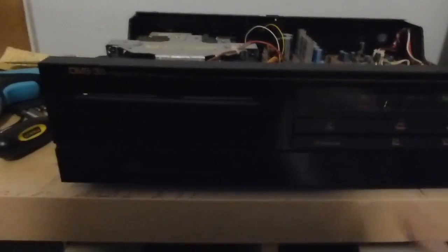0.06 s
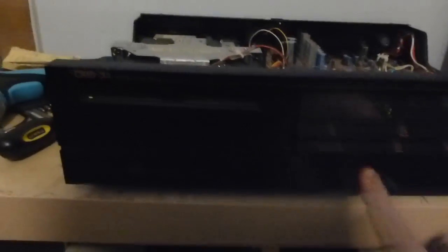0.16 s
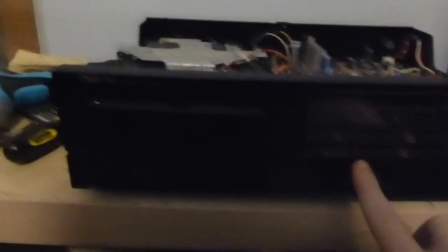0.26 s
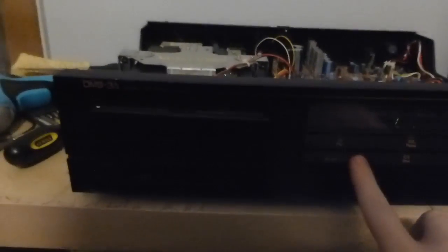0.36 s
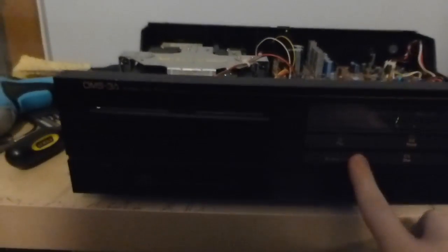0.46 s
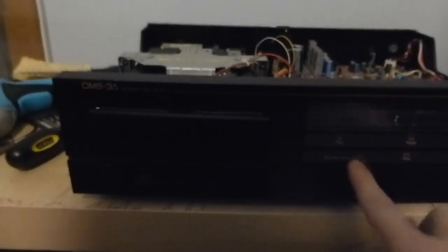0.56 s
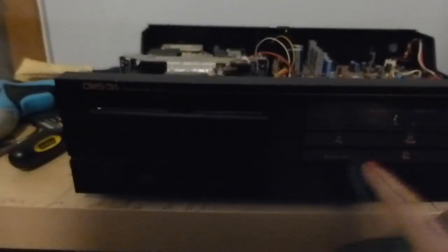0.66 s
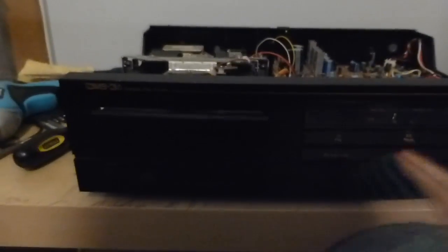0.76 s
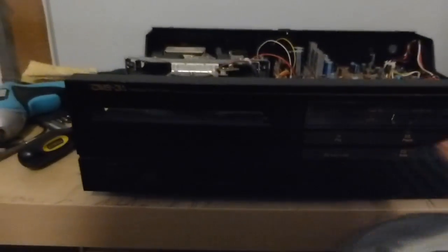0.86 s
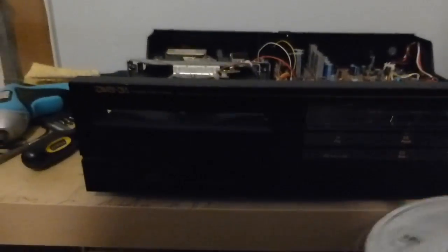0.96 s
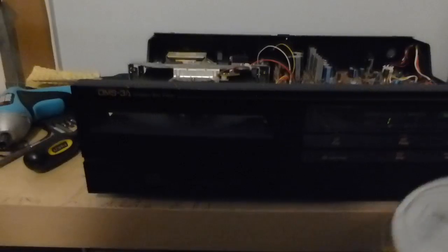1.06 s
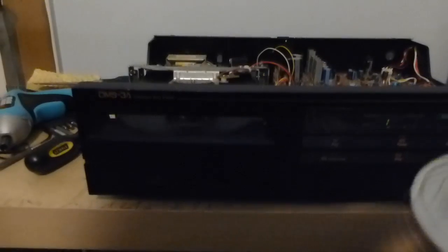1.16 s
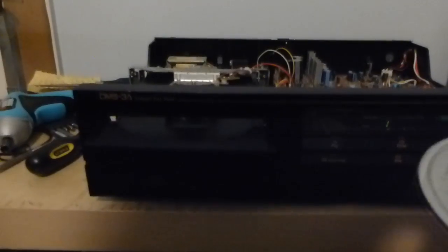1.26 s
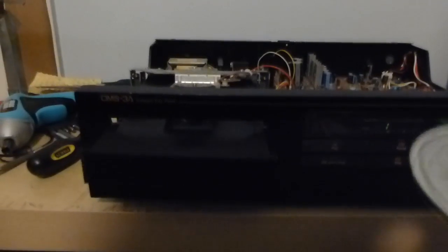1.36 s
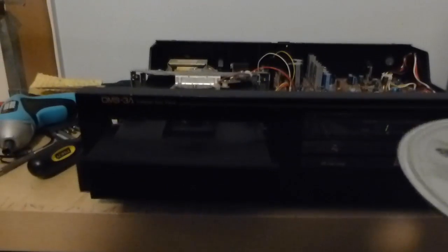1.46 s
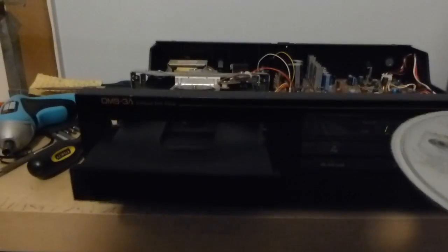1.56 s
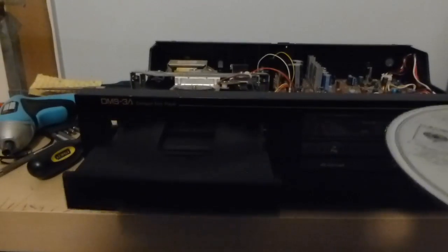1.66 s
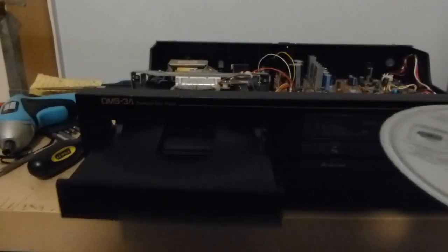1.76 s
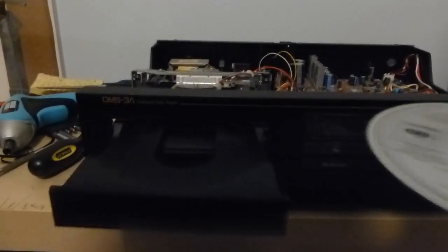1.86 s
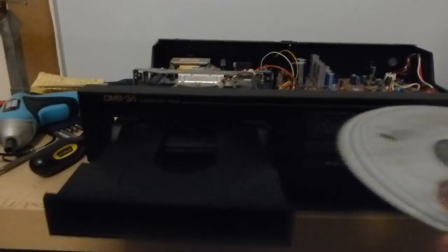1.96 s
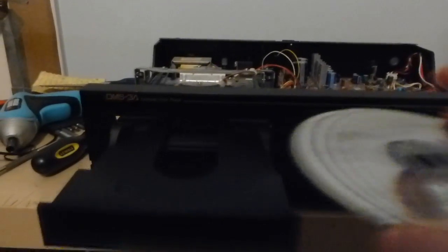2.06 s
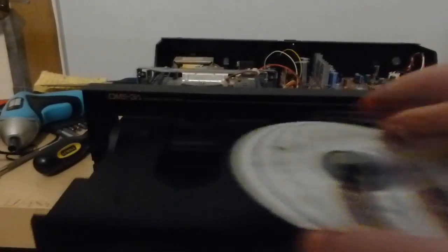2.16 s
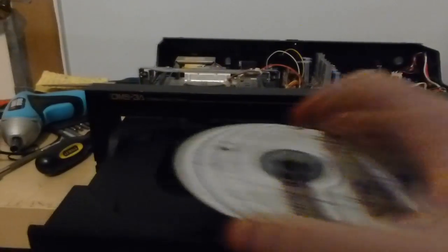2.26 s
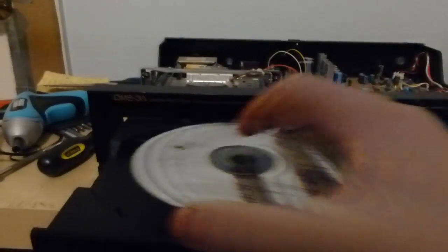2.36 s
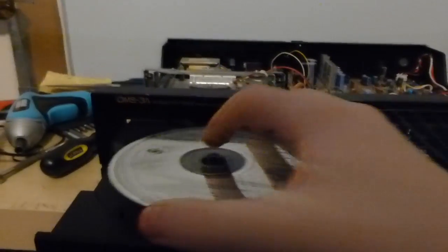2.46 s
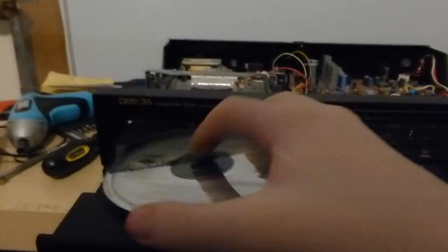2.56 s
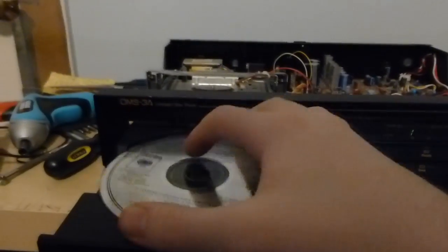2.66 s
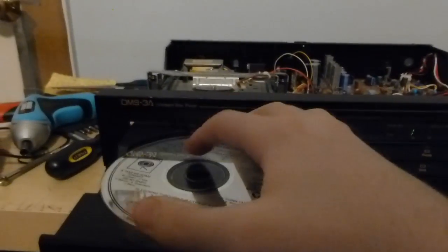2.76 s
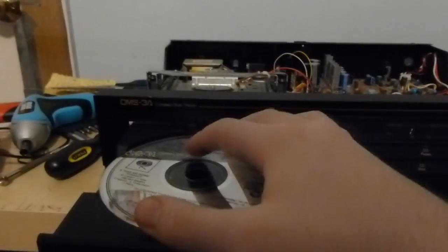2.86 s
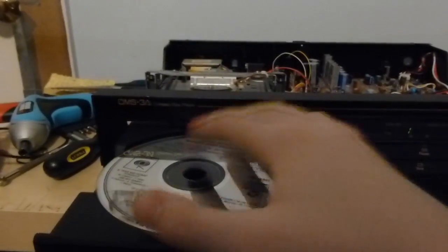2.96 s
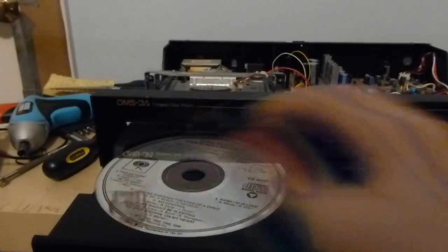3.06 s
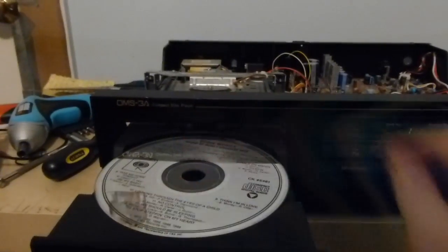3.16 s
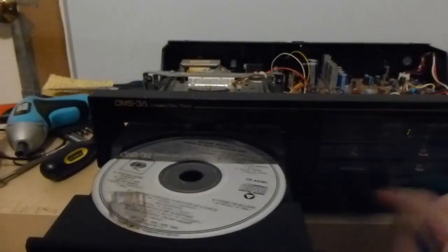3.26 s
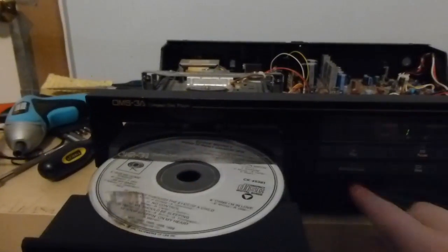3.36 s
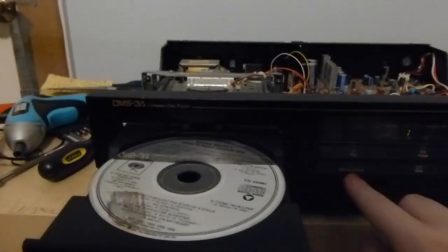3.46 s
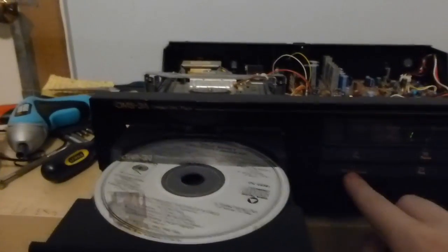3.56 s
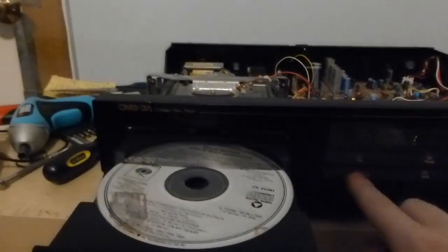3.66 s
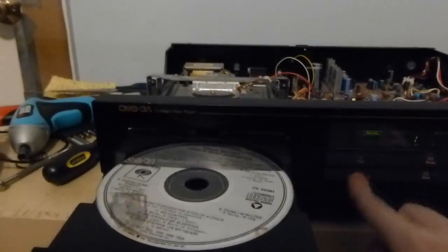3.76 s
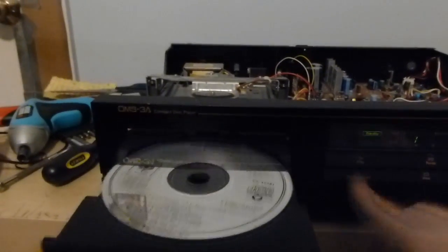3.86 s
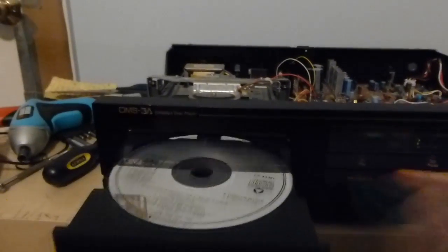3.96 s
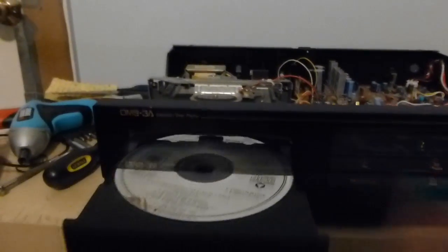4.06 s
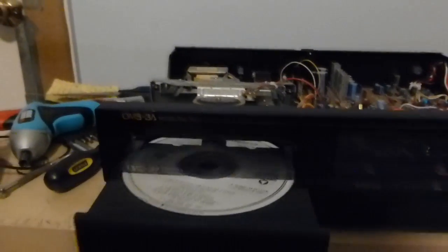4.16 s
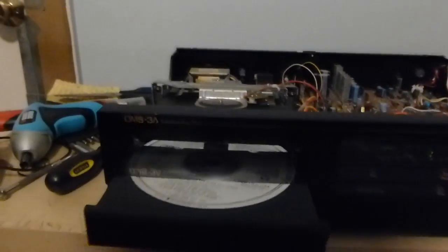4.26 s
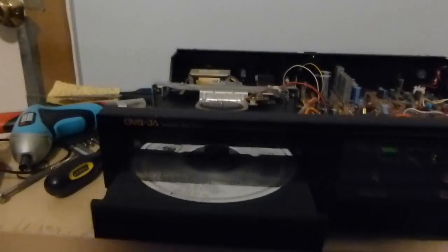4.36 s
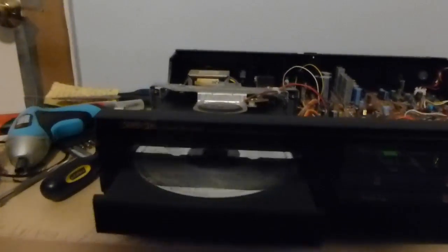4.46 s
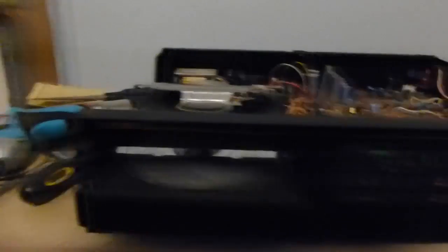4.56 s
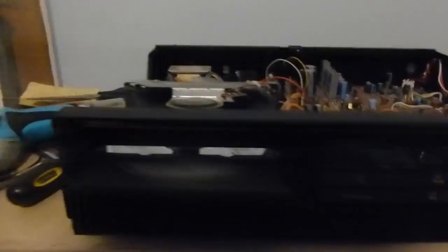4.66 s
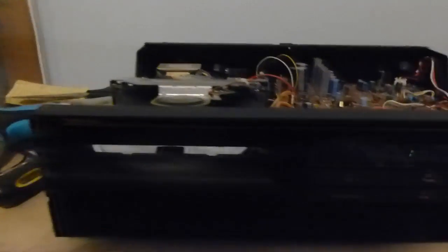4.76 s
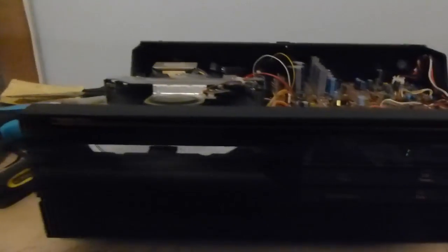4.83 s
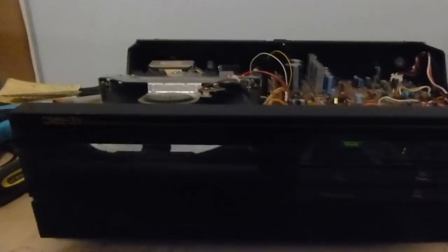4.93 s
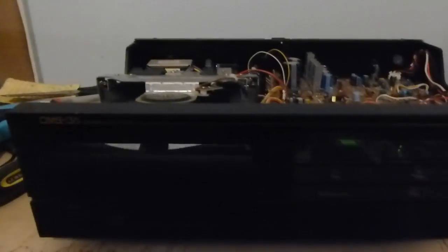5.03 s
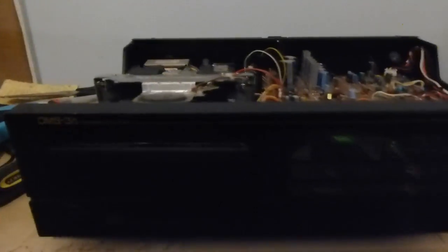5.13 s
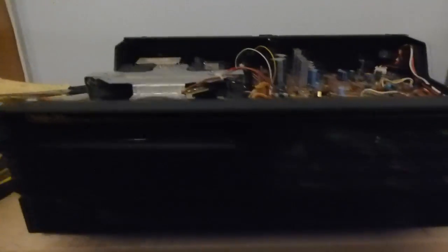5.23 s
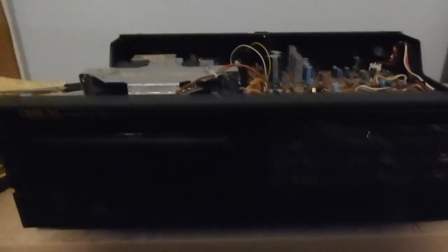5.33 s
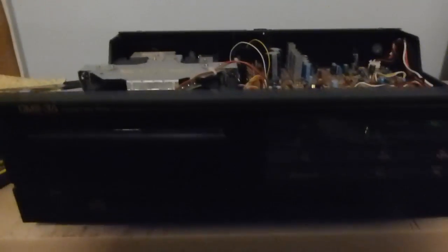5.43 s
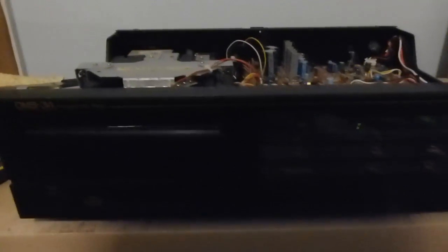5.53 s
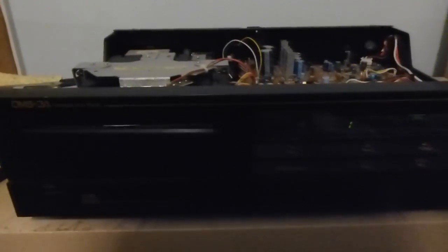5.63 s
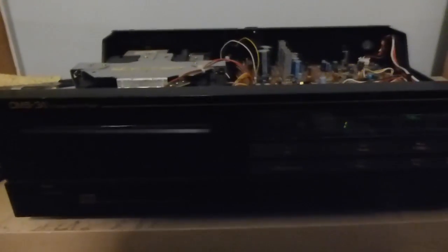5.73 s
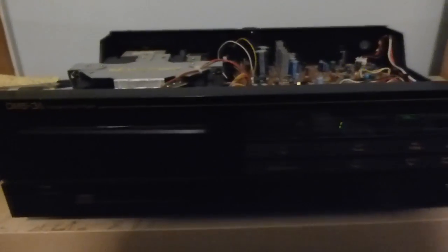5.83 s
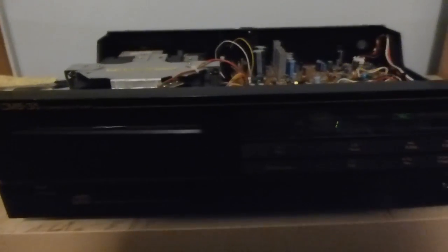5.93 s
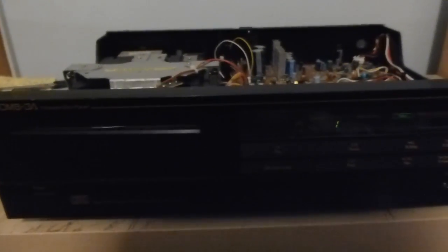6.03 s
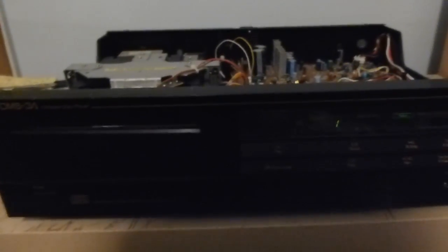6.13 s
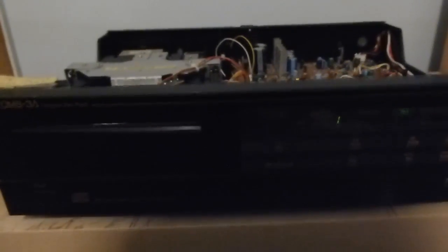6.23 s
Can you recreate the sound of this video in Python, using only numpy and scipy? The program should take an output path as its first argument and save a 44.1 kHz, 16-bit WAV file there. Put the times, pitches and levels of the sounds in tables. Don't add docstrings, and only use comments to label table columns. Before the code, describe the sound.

A disc player's button clicks, steel clunks up, its tray whirs out, a disc drops in, and the tray whirs back shut with a clunk.

```python
import sys
import numpy as np
from scipy import signal
from scipy.fft import rfft, irfft, next_fast_len
from scipy.io import wavfile
from scipy.ndimage import uniform_filter1d, map_coordinates

SR = 44100
rng = np.random.default_rng(int(sys.argv[2]) if len(sys.argv) > 2 else 0)


def undo_db(level):
    steps = np.asarray(level, float) / 20
    return 10 ** steps


def dump_mix(stems):
    frames = np.atleast_2d(stems).T
    limited = np.clip(frames, -1, 1)
    pcm = np.round(limited * 32767).astype(np.int16)
    wavfile.write(sys.argv[1], SR, pcm)


N = 277464
T = np.arange(N) / SR


def unit(x):
    return x / np.sqrt(np.mean(x ** 2) + 1e-20)


def along(points, hz):
    f, v = np.transpose(points)
    return np.interp(np.log(hz + 1), np.log(f + 1), v)


def wobble(rate):
    return map_coordinates(rng.standard_normal(int(N * rate / SR) + 4), [T * rate])


def filtered(x, response):
    n = x.shape[-1]
    m = next_fast_len(n + 8192)
    return irfft(rfft(x, m) * response(np.fft.rfftfreq(m, 1 / SR)), m)[..., :n]


def peak(f, hz, width):
    return 1j * f * width / (hz * hz - f * f + 1j * f * width)


def body(peaks, f):
    return sum((-1) ** k * undo_db(db) * peak(f, hz, width) for k, (hz, width, db) in enumerate(peaks))


def low_cut(f, hz):
    return (1j * f / (hz + 1j * f)) ** 2


def rush(response, alike):
    def turn(hz):
        return np.arccos(np.clip(along(alike, hz), -1, 1)) / 2

    noise = rng.standard_normal((2, N))
    mid, side = filtered(noise, lambda hz: response(hz) * [np.cos(turn(hz)), np.sin(turn(hz))])
    return unit(np.array([mid + side, mid - side]))


def bands(peaks, alike, patchy_db, drift):
    x = rush(lambda f: sum(undo_db(db) * np.abs(peak(f, hz, w)) ** 2 for hz, w, db in peaks), alike)
    z = signal.stft(x, nperseg=1024)[2]
    field = uniform_filter1d(rng.standard_normal(z.shape[1:]), size=5, axis=0)
    field = uniform_filter1d(field, size=8, axis=1)
    x = signal.istft(z * undo_db(patchy_db * unit(field)), nperseg=1024)[1][:, :N]
    read = np.clip(np.cumsum(1 + drift * wobble(3)), 0, N - 1)
    return unit(np.array([np.interp(read, np.arange(N), side) for side in x]))


def add(out, s, sound, db, pan_db=0):
    part = out[:, round(s * SR):][:, :len(sound)]
    gain = undo_db(db + np.array([[pan_db / 2], [-pan_db / 2]]))
    part += (gain * sound / np.abs(sound).max())[:, :part.shape[1]]


def taps(rows, rough, above_hz):
    out, t = np.zeros((2, N)), T[:SR // 20]
    for s, db, hz, swell in rows:
        u = t / (swell + 1e-4)
        jitter = np.cumsum(rng.standard_normal(len(t))) * np.sqrt(hz / SR)
        turns = hz * t + rough * jitter + rng.random()
        add(out, s - swell, u * np.exp(-u) * np.sin(2 * np.pi * turns), db, .8)
    return filtered(out, lambda f: low_cut(f, above_hz) ** 2 / (1 + 1j * f / 13000))


# f/Hz, level/dB rms
HUM = [(120, -59.5), (240, -73)]
# f/Hz, width/Hz, level/dB
FAN = [(267, 28, -2.5), (332, 44, -2), (407, 36, -12), (1075, 56, -6.5), (1162, 37, -4.5), (1210, 46, 1)]
# f/Hz, level/dB per Hz
MURMUR = [(82, -37), (140, -14), (146, -13), (238, -13), (286, -17.5), (316, -4.5), (343, -9.5),
          (708, -12.5), (1060, -10.5), (1600, -18.5), (2080, -60), (3520, -120)]
# f/Hz, level/dB per Hz
PREAMP = [(880, -42), (1500, 2), (1760, 2.5), (3390, -7), (4550, -3), (5650, -3.5), (11400, -10),
          (14200, -12.5), (15700, -13.5)]
# f/Hz, level/dB per Hz
SUB = [(15, -2), (40, -9.5), (65, -21.5), (100, -0.5), (150, 2)]
# f/Hz, likeness/1
ALIKE_FLOOR = [(60, 0.59), (180, 0.99), (550, -0.19), (1650, -0.53), (4970, 0.017), (15000, 0.51)]


def floor():
    hum = 0
    for hz, db in HUM:
        hum = hum + undo_db(db + .4 * wobble(9.3)) * np.sqrt(2) * np.sin(2 * np.pi * hz * T)
    fan = undo_db(-61.5) * bands(FAN, ALIKE_FLOOR, patchy_db=4.0, drift=.018)
    murmur = undo_db(-58.5 + 0.76 * wobble(1.0)) * rush(lambda f: undo_db(along(MURMUR, f)), ALIKE_FLOOR)
    hiss = undo_db(-60.5 + 0.14 * wobble(4.5)) * rush(lambda f: undo_db(along(PREAMP, f)), ALIKE_FLOOR)
    sub = undo_db(-70.5) * rush(lambda f: undo_db(along(SUB, f)) * (f < 150), [(30, 0.28), (120, 0.43)])
    return hum + fan + murmur + hiss + sub


# f/Hz, width/Hz, level/dB
CASE = [(269, 65, -9.5), (334, 38, -2), (432, 86, -8), (564, 17, -4.5), (632, 12, -4), (749, 19, -5),
        (755, 17.4, 0), (865, 20, -6.5), (898, 16, -3.5), (978, 22.5, -1.5), (1070, 62, -11),
        (1212, 21, -11), (1307, 54, -11), (1486, 55, -2.5), (1459, 40.5, -3.5)]
# f/Hz, width/Hz, level/dB
DISC = [(198, 21, -3), (318, 61, 2), (455, 17, 1.5), (590, 53, 0.5), (740, 81, -11), (940, 25, 0.5),
        (1000, 24, -4), (1370, 83, -1), (1500, 44, -7)]
# t/s, peak level/dB, centre f/Hz, spread to other modes/dB
KNOCKS_OPENING = [(0.049, -41.5, 516, -12), (0.524, -32.5, 550, -15), (0.553, -32.5, 920, -7),
                  (0.636, -25, 553, -6), (0.651, -29, 560, 3), (0.691, -29.5, 1010, 1),
                  (0.74, -18.5, 358, -13), (0.769, -21.5, 624, -11), (0.795, -22.5, 630, -14),
                  (0.82, -29, 890, -2), (0.845, -32, 566, -6), (0.992, -32, 1210, -19),
                  (1.038, -32.5, 535, 4), (1.983, -31, 855, 10), (2.104, -43, 560, 0),
                  (2.299, -55, 1220, -4)]
# t/s, peak level/dB, centre f/Hz, spread to other modes/dB
KNOCKS_DISC = [
    (2.664, -37.5, 960, 0),
    (2.714, -43.5, 520, -1),
    (2.749, -28.5, 820, -10),
    (2.764, -26, 915, -6),
    (2.797, -28.5, 700, 6),
    (2.803, -30, 970, 12),
    (2.831, -32, 980, 16),
]
# t/s, peak level/dB, centre f/Hz, spread to other modes/dB
KNOCKS_CLOSING = [(3.871, -34, 532, -11.5), (3.969, -36, 940, -8), (4.153, -34, 600, -4),
                  (4.257, -29.5, 563, -11), (4.291, -29.5, 500, -6), (4.601, -44, 450, -12),
                  (5.069, -35.5, 630, -15), (5.2164, -18.5, 1070, 9), (5.237, -19.5, 432, -6),
                  (5.303, -29, 670, -5), (5.387, -26.5, 1000, -8), (5.559, -46, 281, -24)]
# t/s, peak level/dB, centre f/Hz, spread to other modes/dB
KNOCKS_LATCH = [
    (0.456, -27, 940, -4),
    (5.422, -32, 776, -15),
]
# rise/s, t60 of a -32 dB knock/s, longer/s per dB
KNOCK_SHAPES = [
    (0.0043, 0.06, 0.04),
    (0.0038, 0.19, -0.0141),
    (0.0037, 0.1342, .0025),
    (0.0012, 0.28, 0.08),
]


def knocks():
    out, t = np.zeros((2, N)), T[:SR // 3]
    f = np.fft.rfftfreq(next_fast_len(len(t) + 8192), 1 / SR)
    case, disc = [low_cut(f, 216) * (body(modes, f) + 0.37 * peak(f, 480, 950)) for modes in (CASE, DISC)]
    stages = (KNOCKS_OPENING, KNOCKS_DISC, KNOCKS_CLOSING, KNOCKS_LATCH)
    for rows, hollow, (rise, usual_t60, longer) in zip(stages, (case, disc, case, case), KNOCK_SHAPES):
        for s, db, hz, spread_db in rows:
            t60 = max(usual_t60 + longer * (db + 32.0), .031)
            push = rng.standard_normal(len(t)) * undo_db(-60 * t / t60) * (1 - np.exp(-t / (rise + 1e-4)))
            firmness = np.clip(1.5 - rise / 0.0032, 0, 1)
            push += 4 * np.exp(-(t / 0.00017 - 3) ** 2) * firmness
            reach = undo_db(spread_db) * peak(f, 720, 1004) + peak(f, hz, 0.062 * hz)
            add(out, s, filtered(push, lambda _: hollow * reach), db, .4)
    return out


# t/s, peak level/dB, left-right/dB, brightness/dB per octave
SHUTTER = [
    (0.0496, -42.5, 7, -7.5),
    (6.174, -37.5, 8, -6),
    (6.2497, -10.5, -8.5, 0),
]
# f/Hz, width/Hz, level/dB
SHUTTER_BODY = [(1160, 130, -3), (1670, 260, 1.5), (2910, 350, -8), (4220, 480, -0.5), (4960, 280, -6),
                (5700, 250, -10), (6640, 560, -3)]


def shutter():
    out, t = np.zeros((2, N)), T[:SR // 8]
    for s, db, pan_db, tilt_db in SHUTTER:
        def shell(f):
            tilt = undo_db(tilt_db * np.log2(f / 2000 + 0.11))
            modes = body(SHUTTER_BODY, f) + 0.18 * peak(f, 3300, 4800)
            return tilt * modes * low_cut(f, 770) / (1 + 1j * f / 9000) ** 3

        push = undo_db(-25 - 60 * t / 0.025) * rng.standard_normal(len(t))
        push[[4, 30]] += 1, -.35
        add(out, s, filtered(push, shell), db, pan_db)
        buzz = rng.standard_normal(len(t)) * undo_db(-60 * t / 0.1)
        add(out, s, filtered(buzz, lambda f: peak(f, 2100, 3200) ** 2), db - 26.0, pan_db)
    return out


# f/Hz, width/Hz, level/dB
CHASSIS = [(2070, 20, -1), (3634, 66, 1), (3740, 27, -24), (3760, 280, -4.5), (5360, 130, 2), (5390, 30, 7),
           (6000, 43, -2), (6500, 70, -2), (7340, 48, -15), (7500, 230, -13), (7900, 200, -3),
           (9550, 45, -7), (11100, 63, -14), (10200, 25, -1)]
# f/Hz, level/dB per Hz
SNAP = [(710, -9.5), (1200, 4.5), (1450, -1), (2120, -2), (4730, 0.5), (7660, -2), (13800, -9.5),
        (15800, -22), (16500, -40.5)]
# t/s, peak level/dB, brightest f/Hz, rattle level/dB
CLICKS_OPENING = [(0.4561, -25.5, 2185, 0), (0.5197, -28, 3350, -9), (0.571, -31, 3850, -2),
                  (0.6338, -24, 3600, 15), (0.6915, -26, 6070, -12), (0.729, -20.5, 2200, 16.5),
                  (0.735, -11.5, 8500, 13), (0.7696, -14, 3200, -1), (0.7883, -13.5, 3750, 3.5),
                  (0.989, -36, 5130, -17), (0.9905, -31.5, 2300, -5.5), (1.037, -33, 2480, -6),
                  (1.17, -51, 5200, -25), (1.943, -30, 4400, -11.5), (1.9853, -22.5, 7500, -19)]
# t/s, peak level/dB, brightest f/Hz, rattle level/dB
CLICKS_DISC = [
    (2.664, -35.5, 1670, 3),
    (2.68, -43, 3850, -5),
    (2.7533, -19.5, 1500, -14.5),
    (2.7575, -24, 1500, -7),
    (2.8042, -29.5, 2310, -11.5),
    (2.833, -34, 1500, -19),
]
# t/s, peak level/dB, brightest f/Hz, rattle level/dB
CLICKS_CLOSING = [(3.8675, -23.5, 3470, -9), (3.9494, -30.5, 6700, -3), (3.9684, -17.5, 7900, -13.5),
                  (4.152, -32.5, 3250, -10), (4.2575, -21.5, 6500, -11.5), (4.292, -19.5, 5560, -22),
                  (4.47, -33.5, 5000, -2), (5.064, -33, 2100, -1), (5.102, -32.5, 2010, -10),
                  (5.209, -32, 2190, 14), (5.2257, -17, 2070, -4), (5.303, -27, 1570, 3),
                  (5.3798, -29, 4050, -16), (5.388, -27, 1840, -8), (5.4217, -24, 4960, -21),
                  (5.4351, -32.5, 2310, 9), (5.6126, -46.5, 1620, -17.5)]
# t/s, peak level/dB, brightest f/Hz, rattle level/dB
CLICKS_STOPS = [
    (0.738, -8, 10500, -6.5),
    (0.7517, -8.5, 6500, -10.5),
    (0.759, -8.5, 7600, -9),
    (2.2974, -30, 4050, -6.5),
    (5.2188, -8.5, 2650, -5.5),
]
# crack t60/s, brightness/dB per octave, rattle t60/s
CLICK_SHAPES = [
    (0.021, -2, 0.26),
    (0.025, -2, 0.2),
    (0.016, -2, 0.19),
    (0.012, 0.5, 0.2),
]


def clicks():
    out, t = np.zeros((2, N)), T[:SR // 5]
    f = np.fft.rfftfreq(next_fast_len(len(t) + 8192), 1 / SR)
    frame = low_cut(f, 620) * undo_db(along(SNAP, f)) * (1 + 0.47 * body(CHASSIS, f))
    stages = (CLICKS_OPENING, CLICKS_DISC, CLICKS_CLOSING, CLICKS_STOPS)
    for rows, (t60, usual_tilt_db, rattle_t60) in zip(stages, CLICK_SHAPES):
        for s, db, hz, rattle_db in rows:
            tilt_db = usual_tilt_db + 2.5 * np.log2(hz / 4000)
            grains = undo_db(2.43 * uniform_filter1d(rng.standard_normal(len(t)), size=64) * 10.7)
            crack = 0.8 * undo_db(-60 * t / 0.0049) + undo_db(-60 * t / t60)
            shape = crack + undo_db(rattle_db - 60 * t / rattle_t60) * grains
            push = rng.standard_normal(len(t)) * shape * (1 - np.exp(-t / 0.00089))
            push[12] += 4
            hardness = undo_db(tilt_db * np.log2(f / 4000 + 0.23))
            colour = frame * hardness * (0.62 + peak(f, hz, 0.14 * hz))
            add(out, s, filtered(push, lambda _: colour), db, 1.2)
    return out


# t/s, peak level/dB, f/Hz, swell/s
NUDGES = [(0.9915, -39, 5310, .001), (0.9925, -37, 1904, 0.00096), (1.0395, -36, 4900, .001),
          (1.0405, -34, 1500, 0.0011), (1.1725, -49.5, 5200, .001), (2.107, -44, 565, 0.0031),
          (2.119, -40.5, 617, 0.0029), (2.129, -42.5, 483, 0.0029), (2.14, -46, 596, 0.0028),
          (2.2995, -34, 7850, .0008), (2.3, -36, 11950, .0005), (2.6815, -42, 5500, .0005),
          (4.155, -39, 5870, .001), (4.2595, -29, 4090, .0012), (4.2605, -32, 3070, 0.00101),
          (4.294, -30.5, 4300, .0012), (5.2225, -16.5, 2790, .001), (5.2205, -21, 4670, .0007),
          (2.758, -28, 5200, .001), (2.8335, -39.5, 5100, .001), (0.4568, -29, 3860, 0.00037),
          (2.666, -45, 4800, .001), (5.3815, -36, 4000, .001), (5.4235, -26, 5200, .0012),
          (5.4235, -30, 8200, 0.00094)]


def nudges():
    return taps(NUDGES, rough=.16, above_hz=150)


# t/s, peak level/dB, f/Hz, swell/s
BUMPS_UP = [(0.6605, -23, 518, 0.0037), (0.6817, -36, 547, 0.0033), (0.7048, -31, 1028, 0.0028),
            (0.744, -23.5, 1210, 0.0019), (0.751, -23.5, 327, 0.0034), (0.7606, -23.5, 970, 0.0021),
            (0.7729, -19, 570, 0.0029), (0.7804, -24, 576, .002), (0.7904, -23, 630, 0.0021),
            (0.7957, -19.5, 672, 0.0017), (0.81, -22, 633, 0.00403), (0.817, -21, 467, 0.0018),
            (0.8227, -24, 980, 0.00204), (0.8285, -23.5, 570, .002), (0.8379, -25, 590, .004),
            (0.8606, -31, 554, 0.00313), (0.8718, -33, 1020, .003), (0.8885, -32.5, 570, 0.0028),
            (0.9222, -42, 576, 0.0025), (0.9961, -45, 1260, 0.00296), (1.0433, -39.5, 944, .003),
            (2.6686, -38.5, 1405, 0.002), (2.7547, -21, 780, 0.0011), (2.807, -27.5, 680, 0.0011),
            (0.4605, -28, 940, 0.0025), (0.469, -33.5, 914, 0.0031), (0.53, -39, 524, 0.0041),
            (4.268, -33.5, 557, .003), (4.301, -36, 542, .004)]
# t/s, peak level/dB, f/Hz, swell/s
BUMPS_DOWN = [(5.0761, -41, 586, 0.0031), (5.1145, -39, 554, 0.0032), (5.2271, -22.5, 1105, 0.00251),
              (5.2341, -19.5, 460, 0.0023), (5.2465, -22.5, 429, 0.0039), (5.2554, -26, 626, 0.0018),
              (5.2636, -31, 403, 0.0023), (5.2774, -31, 543, 0.00404), (5.2954, -33, 465, 0.0021),
              (5.3036, -31, 565, 0.0032), (5.3298, -32, 604, 0.0022), (5.3912, -30, 630, 0.0028),
              (5.4037, -27.5, 560, 0.0027), (5.4238, -13.5, 777, 0.001), (5.428, -22.5, 656, 0.00161),
              (5.4375, -22, 791, 0.00215), (5.4465, -25.5, 775, 0.0028), (5.4545, -25, 767, .0022),
              (5.4714, -34, 810, 0.0021), (5.4886, -37.5, 748, .002), (6.176, -40, 1760, 0.0014)]


def bumps():
    return undo_db(1.2) * taps(BUMPS_UP + BUMPS_DOWN, rough=.05, above_hz=149)


# t/s, level/dB
MOTOR = [
    [(0.46, -40.5), (0.55, -61), (0.694, -44), (0.835, -31.5), (0.894, -47), (1.03, -57.5), (1.6, -56.5),
     (2.054, -53), (2.332, -55)],
    [(3.865, -54), (3.921, -49), (4.043, -51), (5.109, -51.5), (5.289, -39.5), (5.345, -43.5), (5.469, -49)],
]
# from t/s, to t/s, hiss level over load/dB
SLIDES = [
    (0.793, 2.354, -2),
    (3.96, 5.13, -0.6),
]
# f/Hz, level/dB per Hz
RUMBLE = [(110, -23), (180, -7), (269, 4), (372, -7.5), (440, 6), (920, -4), (1080, -5), (1200, -0.5),
          (1560, -8.5), (2130, -20), (2600, -26), (3380, -43), (5720, -120)]
# f/Hz, width/Hz, level/dB
WHINE = [(1210, 33, 2.5), (1400, 29, -5.5), (1760, 59, -5.5), (1967, 58, -8.5), (2180, 60, -7.5),
         (4050, 200, -11.5), (4800, 230, -14.5)]
# f/Hz, level/dB per Hz
SLIDE = [(880, -28), (1500, -2.5), (2120, -2), (2400, -6), (2900, 0), (3460, -5), (3970, -4.5),
         (4420, -8.5), (4780, -3), (5710, -6), (6360, -4), (10800, -7.5), (13000, -6), (14000, -10.5),
         (15700, -17)]
# from f/Hz, to f/Hz, level/dB
SQUEAL = (12400, 13750, 3.5)
# f/Hz, likeness/1
ALIKE_TRAY = [(60, 0.69), (180, 0.74), (550, 0.95), (1650, 0.44), (4970, 0.75), (15000, 0.68)]


def tray():
    coast, grip, slip = 172, 76, 91
    rumble_db, hiss_db = np.full((2, N), -120.)
    for rows, (start, stop, rub_db) in zip(MOTOR, SLIDES):
        s, load_db = np.transpose(rows)
        on = T >= s[0]
        t = T[on]
        rumble_db[on] = np.interp(t, s, load_db) - coast * np.maximum(t - s[-1], 0)
        off_rail_db = grip * np.maximum(start - t, 0) + slip * np.maximum(t - stop, 0)
        hiss_db[on] = rumble_db[on] + rub_db - off_rail_db

    def rail(f):
        low, high, db = SQUEAL
        squeal = undo_db(db * ((f > low) & (f < high)))
        return undo_db(along(SLIDE, f)) * squeal * (1 + 0.42 * np.abs(body(CHASSIS, f)))

    teeth = wobble(45)
    rumble = rush(lambda f: undo_db(along(RUMBLE, f)) * (0.42 + 1.4 * np.abs(body(CASE, f))), ALIKE_TRAY)
    rumble *= undo_db(1.45 * teeth + 0.54 * wobble(24))
    whine = undo_db(-5.5) * bands(WHINE, ALIKE_TRAY, patchy_db=3.5, drift=.022)
    hiss = rush(rail, ALIKE_TRAY)
    hiss *= undo_db(hiss_db + 1.18 * teeth + 0.93 * wobble(430) + 0.24 * wobble(4.28))
    pan = undo_db(np.array([[.4], [-.4]]))
    return ((rumble + whine) * undo_db(rumble_db) + hiss) * pan


# t/s, peak level/dB, f/Hz, swell/s
TICKS = [(0.5205, -27.5, 3420, .001), (2.299, -35, 3900, .0008), (0.955, -46, 7350, 0.0055),
         (0.94, -53, 4170, 0.0055), (0.957, -42, 9000, 0.0028), (0.7404, -12, 4170, 0.00077),
         (0.7524, -4, 7500, .0003), (0.7541, -10, 6000, 0.00035), (0.7599, -14, 7630, 0.00053),
         (0.7653, -18, 5750, .001), (0.7897, -24, 3300, 0.00101), (0.7963, -30, 2890, 0.00095),
         (0.809, -23, 4240, .001), (0.8243, -20.5, 3290, 0.00092), (0.8352, -25, 3170, .001),
         (0.8516, -31, 4100, .0015), (0.9057, -40, 9100, .0015), (0.9229, -40, 8909, 0.0027),
         (0.9996, -36, 2460, 0.0016), (1.0419, -36, 2414, 0.001), (1.0476, -37, 2530, 0.0014),
         (2.7397, -39, 6660, 0.00022), (2.7492, -40, 2590, 0.00069), (2.8, -36, 6930, .0006),
         (3.978, -34, 7900, 0.00079), (5.2198, -12, 7050, .0007), (5.2301, -27, 2150, .001),
         (5.2378, -21, 2140, .001), (5.2445, -24, 3100, 0.00091), (5.2527, -23, 2050, 0.0009),
         (5.2587, -30, 2210, 0.00093), (5.3024, -33, 1820, 0.0012), (5.3132, -33, 4920, 0.0012),
         (5.3227, -34, 1980, 0.00081), (5.4309, -29, 2180, 0.00086)]


def ticks():
    return undo_db(1.2) * taps(TICKS, rough=.21, above_hz=600)


# t/s, level/dB
THUMPS = [
    (0.55, -58),
    (0.738, -38),
    (2.3, -58),
    (2.664, -51),
    (2.754, -38),
    (4.0, -56),
    (4.3, -55),
    (5.221, -37.5),
    (5.42, -45),
]


def shelf():
    out, t = np.zeros((2, N)), T[:SR // 4]
    for s, db in THUMPS:
        push = rng.standard_normal(len(t)) * undo_db(-60 * t / 0.13)
        add(out, s, filtered(push, lambda f: peak(f, 170, 112) ** 2 + 0.24 * peak(f, 65, 60)), db)
    return out


# f/Hz, width/Hz, level/dB
PLATE = [(4170, 150, -8), (6160, 180, -2), (7350, 140, -6.5), (8860, 240, -4.5), (10500, 350, -6.5)]
# t/s, level/dB, t60/s
PLATE_BLOWS = [
    (0.745, -25.5, 0.5),
    (0.902, -41.5, 0.45),
    (5.221, -31, 0.14),
]


def plate():
    out, t = np.zeros((2, N)), T[:SR // 2]
    for s, db, t60 in PLATE_BLOWS:
        push = rng.standard_normal(len(t)) * undo_db(-60 * t / t60) * (1 - np.exp(-t / 0.01))
        add(out, s, filtered(push, lambda f: body(PLATE, f) ** 2), db, 1)
    return out


# t/s, peak level/dB, f/Hz,
# width/Hz, t60/s
RINGS = [(0.76, -23, 2980, 310, 0.16), (5.226, -29, 1900, 270, 0.11), (5.222, -31, 2770, 300, 0.07),
         (5.428, -34, 2370, 600, 0.19), (5.388, -38, 1900, 500, 0.12), (5.424, -40, 8100, 600, 0.18),
         (1, -45, 5400, 240, .1), (3.3, -56, 1200, 100, .1), (3.0, -51, 910, 170, 0.064),
         (6.222, -50, 1800, 1800, 0.33), (5.424, -39, 4940, 500, 0.2), (2.58, -53, 4400, 3900, 0.99),
         (3.086, -48, 1200, 130, 0.046), (2.681, -37, 8500, 2000, 0.018)]


def rings():
    out, t = np.zeros((2, N)), T[:SR // 3]
    for s, db, hz, width, t60 in RINGS:
        push = rng.standard_normal(len(t)) * undo_db(-60 * t / t60)
        add(out, s, filtered(push, lambda f: peak(f, hz, width) ** 2), db, 1)
    return out


# delay t/s, level/dB
WALLS = [(.0005, -23), (.0011, -17), (.0023, -16), (.0041, -14.5), (.0068, -14.5), (0.0096, -16)]


def early(x):
    skew = np.array([[.88], [1.12]])

    def reflect(f):
        treble = 1.2j * f / (2500 + 1j * f)
        return treble * sum(undo_db(db) * np.exp(-2j * np.pi * f * delay * skew) for delay, db in WALLS)

    return filtered(x, reflect)


# f/Hz, t60/s
ROOM = [(200, 0.6), (1000, 0.36), (4000, 0.34), (12000, 0.76)]


def room(x):
    hz, t, z = signal.stft(rng.standard_normal((2, SR // 2)), SR, nperseg=256)
    tail = signal.istft(z * undo_db(-60 * t / along(ROOM, hz)[:, None]), SR, nperseg=256)[1]
    late = np.pad(x, ((0, 0), (130, 0)))
    return signal.fftconvolve(late, tail / np.linalg.norm(tail[0]), axes=1)[:, :N]


def scene():
    hits = knocks() + clicks() + bumps() + ticks() + plate() + rings()
    tail = undo_db(-16.0) * room(filtered(hits, lambda f: low_cut(f, 200)))
    hits = hits + nudges()
    return hits + early(hits) + tail + floor() + shutter() + tray() + shelf()


def band_limit(x):
    return signal.sosfilt(signal.butter(12, 16810, fs=SR, output="sos"), x)


# f/Hz, level/dB
MIC_TOP = [(15000, -0.5), (15750, -8), (15900, -25), (16700, -34)]


def record(dry):
    mix = filtered(dry, lambda f: undo_db(along(MIC_TOP, f))) - .003
    return band_limit(mix)


dry = scene()
out = record(dry)
dump_mix(out)
```